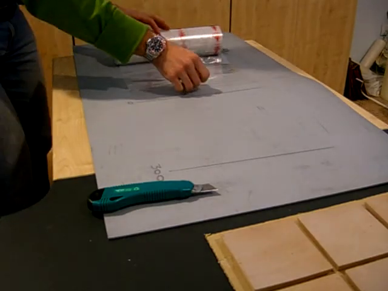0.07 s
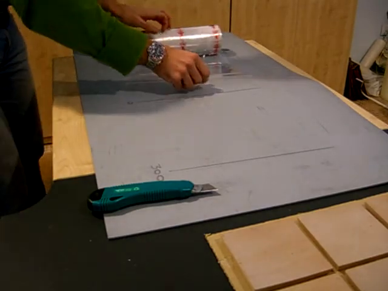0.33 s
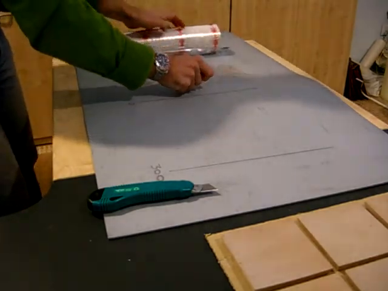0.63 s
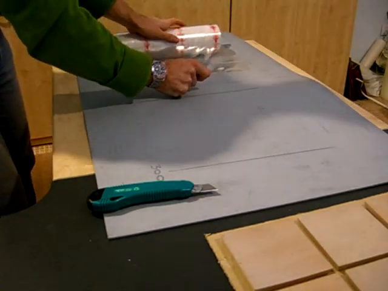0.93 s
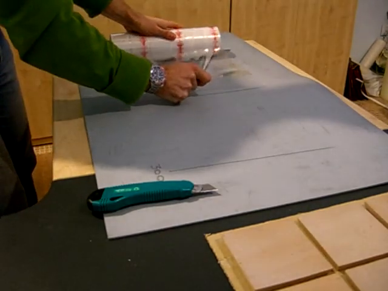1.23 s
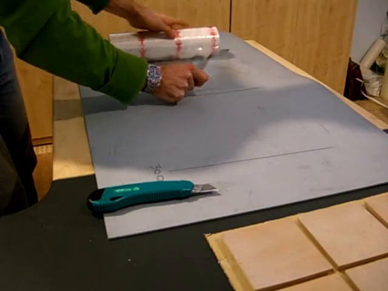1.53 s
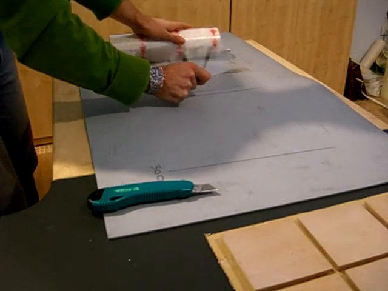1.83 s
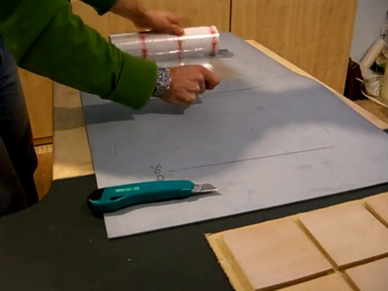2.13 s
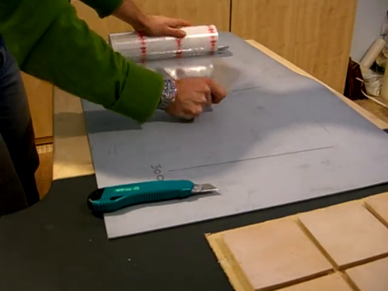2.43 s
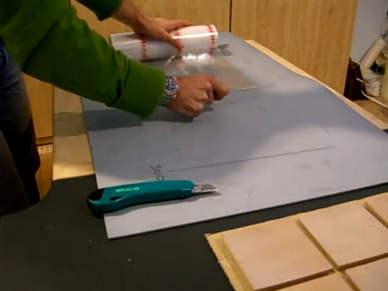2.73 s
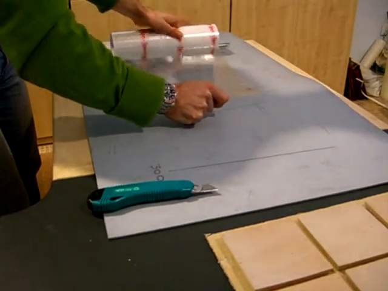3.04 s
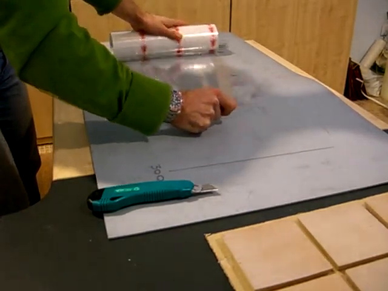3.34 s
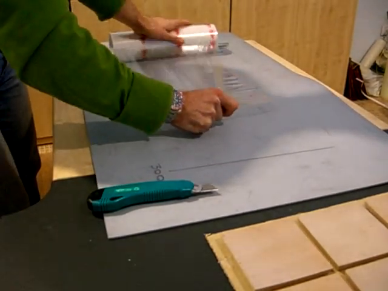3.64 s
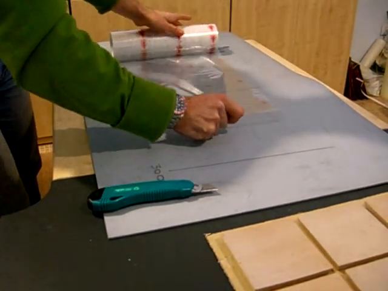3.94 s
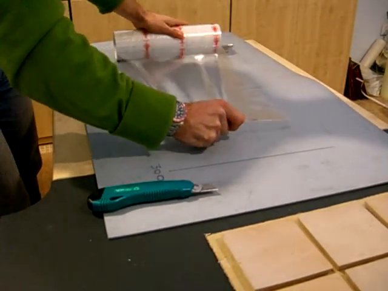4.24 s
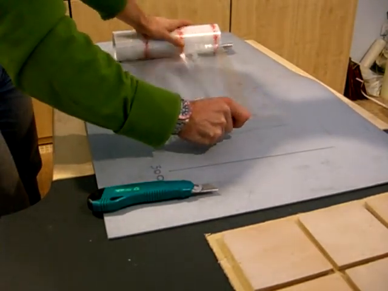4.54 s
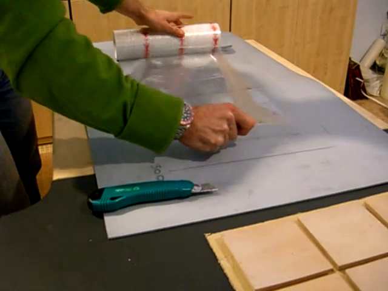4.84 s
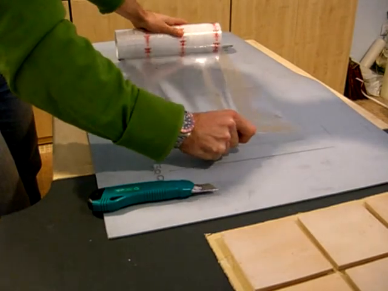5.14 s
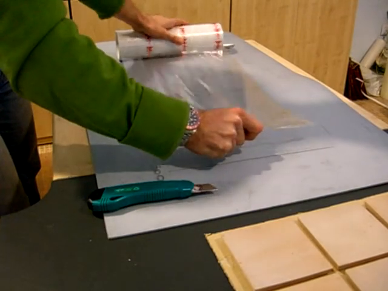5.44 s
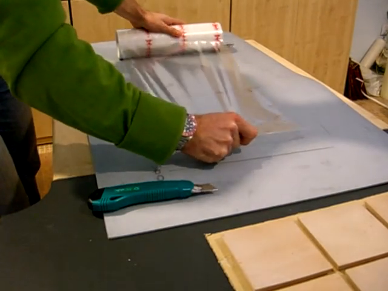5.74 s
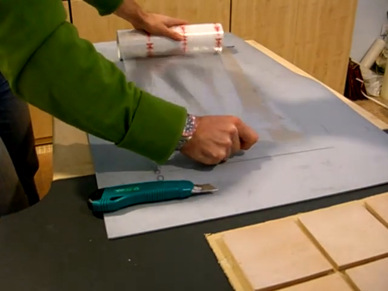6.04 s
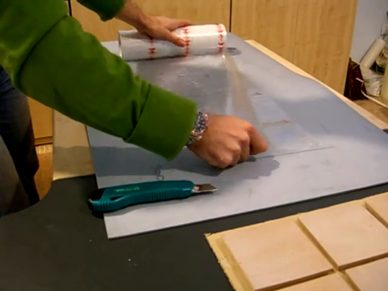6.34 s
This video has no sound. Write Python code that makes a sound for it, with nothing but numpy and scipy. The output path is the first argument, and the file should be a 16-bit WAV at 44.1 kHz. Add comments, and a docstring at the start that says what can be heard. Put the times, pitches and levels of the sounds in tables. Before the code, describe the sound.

Clear adhesive film is pulled off its roll in short tugs over a table in a small room. After faint handling and a softer first pull, a run of louder pulls follows about twice a second, each a sharp snap, a quick rip and a fading, slightly hollow hiss. The roll rubs and bumps softly on the board. It ends with a weak tug and light crinkles, heard close over a low hum and thin electrical whine.

```python
"""Clear adhesive film is pulled off its roll in short tugs, over a table in a small room.
Each tug breaks the glue with a snap, rips on in quick stick-slip, then peels with a hiss that dulls
as the roll slows, while the free strip rings with a hollow note. The roll rubs and bumps on the board
and the film ticks as it is handled. A thin electrical whine lies over the room's hum."""
import sys
import numpy as np
from scipy import signal
from scipy.fft import rfft, irfft, next_fast_len
from scipy.io import wavfile
from scipy.ndimage import minimum_filter1d

SR = 44100
rng = np.random.default_rng(int(sys.argv[2]) if len(sys.argv) > 2 else 0)


def dump(signal):
    """Clip the signal to [-1, 1] and save it as 16-bit WAV at the path in sys.argv[1]."""
    limited = np.clip(np.atleast_2d(signal).T, -1, 1)
    pcm = np.round(limited * 32767).astype(np.int16)
    wavfile.write(sys.argv[1], SR, pcm)


N = 281137
TIME = np.arange(N) / SR

# The tugs on the film; levels are relative. Each row: start in seconds, opening snap in dB, rip length
# in seconds, rip level in dB, slips per second, depth of sticking from 0 to 1, peel hiss in dB, seconds
# until the roll slows, opening treble in dB, rub in dB, wind-up before the tug in seconds, note of the
# free strip in Hz, its level against the hiss in dB.
TUGS = [(0.894, -25, 0.023, -28.5, 190, 0.7, -37.5, 0.085, 6, -46, 0.036, 2304, -13),
        (1.036, -17.5, .044, -18.5, 170, 0.4, -27, 0.19, 8, -33.5, 0.0043, 2090, -13),
        (1.887, -8.5, 0.046, -12.5, 270, 0.37, -20.5, 0.25, 7.3, -30.5, 0.002, 2453, -8.5),
        (2.347, -10.5, 0.067, -11.5, 168, 0.42, -20.5, 0.25, 8, -29.5, 0.049, 2207, -7),
        (2.800, -10, 0.043, -11, 190, 0.45, -23.2, 0.22, 9, -32.5, 0.034, 2117, -9),
        (3.257, -7.5, 0.039, -10, 350, 0.09, -19, 0.21, 6.5, -30.5, .04, 2294, -4),
        (3.658, -11, .057, -10, 126, 0.35, -20.5, 0.22, 7.5, -30, 0.025, 1950, -11),
        (4.129, -11, 0.038, -10, 155, 0.68, -22, 0.18, 7, -30.5, 0.066, 1946, -10.5),
        (4.548, -12, 0.019, -12.5, 140, .45, -34.5, .03, -1, -29, .03, 1692, -6),
        (4.574, -12, .05, -9.5, 210, .45, -19.5, 0.21, 6.5, -31.5, 0.0081, 1710, -7),
        (5.017, -7.5, 0.033, -9.5, 150, 0.45, -21, .185, 7, -29, 0.068, 1994, -6.5),
        (5.480, -20, 0.032, -23.5, 86, 0.64, -32, 0.039, 3, -33.5, 0.026, 2190, -6.5)]
# The bright tone of snaps and ticks. Each row: frequency in Hz, relative level in dB.
SNAP_COLOUR = [(100, -29), (300, -5), (900, -2), (1400, -2), (2200, 5), (3000, -1.5), (4300, 4.5),
               (6500, 0), (8300, -1.5), (10000, -3), (12200, 3.5), (14000, -3), (16000, -3.5)]


def rips(release_s=0.012, jitter=0.27, sag_db=2.0, uneven_db=1.64):
    """The peel line sticks and jumps at an uneven rate; each jump is a burst of cracks."""
    # The tone of the rip. Each row: frequency in Hz, relative level in dB.
    rip_colour = [(100, -25.5), (250, -16.5), (500, -4.5), (1100, -4), (2100, 2), (3200, -2.5), (4400, 4.5),
                  (6200, -1), (7800, 1.5), (10000, -3), (12200, 3), (14000, -11), (16000, -9.5)]
    power, pace = np.zeros(N), np.exp(jitter * drift(200))
    for start, _, length_s, level_db, slips_per_s, sticking, *_ in TUGS:
        first, count = int(start * SR), SR // 4
        age = TIME[:count]
        slip_index, phase = np.divmod(np.cumsum(slips_per_s * pace[first:first + count]) / SR, 1)
        strength = from_db(uneven_db * rng.standard_normal(count))[slip_index.astype(int)]
        slips = rms_one(1 - sticking + 2 * sticking * strength * np.exp(-2 * phase))
        release = np.exp(-np.maximum(age - length_s, 0) / release_s)
        tension = from_db(level_db - sag_db * age / length_s) * release
        power[first:first + count] += (tension * slips) ** 2
    return np.sqrt(power) * colour(cracks(per_s=9000, spread_db=2.0), rip_colour)


def snaps(decay_s=0.0015, trim_db=-1, body_hz=1500, tug_body_db=6.5, tug_edge_hz=16000, count=900):
    """A whole strip of glue lets go at once and shakes the taut film; every tug opens this way."""
    # Stray snaps of glue and flicks of film. Each row: start in seconds, relative level in dB,
    # boost or cut of the low body in dB, upper edge in Hz.
    strays = [(.463, -38.5, 12.5, 6000), (.563, -40, 13.5, 12000), (.873, -26, -10.5, 12000),
              (.882, -18.5, -11, 12000), (1.734, -23, -10, 4520), (2.357, -16, 4, 15000),
              (3.654, -14, 12, 15000), (4.091, -24, 8, 12000), (4.101, -18, -6, 11940),
              (4.538, -16, 2, 15000), (4.542, -12, 5, 14900), (4.569, -8, -12, 9030),
              (5.498, -14.5, 7.5, 12400), (6.028, -36, -2, 8000), (6.098, -33.5, 3, 8050),
              (6.205, -42, 12, 8000), (6.221, -40, 1, 8000)]
    openings = [(start, snap_db, tug_body_db, tug_edge_hz) for start, snap_db, *_ in TUGS]
    out, lowpass = np.zeros(N), signal.butter(1, body_hz, fs=SR)
    for start, snap_db, body_db, edge_hz in openings + list(strays):
        burst = rng.choice([-1, 1], count) * np.exp(-TIME[:count] / decay_s)
        burst *= np.sqrt(.003 * SR) / np.linalg.norm(burst)   # the energy of 3 ms at unit rms
        burst += (from_db(body_db) - 1) * signal.lfilter(*lowpass, burst)
        burst = signal.lfilter(*signal.butter(2, edge_hz, fs=SR), burst)
        out[int(start * SR):][:count] += from_db(snap_db + trim_db) * burst
    return colour(out, SNAP_COLOUR)


def roll_motion(swell_db_per_s=15.5, fade_db_per_s=61.5, dulling_db_per_s=50, dullest_db=-10.5,
                wind_up_db=7.5, rub_fade_db_per_s=47.5):
    """Each tug spins the roll, which gathers speed, then slows: hiss in dB, treble in dB, rub gain."""
    rustle, scuff, _ = handling()
    hiss_power, rub_power, trebles = rustle ** 2, scuff ** 2, []
    for start, *_, hiss_db, run_s, treble_db, rub_db, wind_up_s, _, _ in TUGS:
        age = TIME - start
        hiss_drop_db = np.maximum(swell_db_per_s * (run_s - age), fade_db_per_s * (age - run_s))
        hiss_power += (age >= 0) * from_db(hiss_db - hiss_drop_db) ** 2
        # The rub builds ahead of the tug and dies away after it.
        rub_drop_db = np.maximum(-wind_up_db * age / wind_up_s, rub_fade_db_per_s * age)
        rub_power += from_db(rub_db - np.minimum(rub_drop_db, 100)) ** 2
        trebles.append((start, treble_db))
    start, treble_db = hold_rows(trebles)
    bright_db = np.maximum(treble_db - dulling_db_per_s * (TIME - start), dullest_db)
    return 10 * np.log10(hiss_power), np.where(TIME < start, dullest_db, bright_db), np.sqrt(rub_power)


def peel(hiss_db, bright_db, trim_db=3.0, treble_db=-0.84, flutter_db=-0.27, thinning=.6):
    """Steady peeling is a dense, fine crackle; the slower it goes, the sparser and duller it is."""
    # The tone of the peel. Each row: frequency in Hz, relative level in dB.
    peel_colour = [(150, -30), (500, -13.5), (1200, -5.5), (1800, -1), (2500, 0), (3400, -2), (4500, -5),
                   (6200, -3.5), (8100, 1.5), (10000, -9.5), (12200, -1.5), (14000, -11.5), (16000, -20.5)]
    # Each row: band centre in Hz, share of the treble change.
    dulling = [(1200, -0.2), (2500, 0.1), (4500, 0.02), (8000, 0.75), (12000, 1.58), (15000, 2.0)]
    centres, shares = zip(*dulling)
    per_s = 18000 * from_db(thinning * np.maximum(hiss_db - hiss_db.max(), -40))
    parts = bands(colour(cracks(per_s, spread_db=1.5), peel_colour), centres)
    hiss = sum(part * from_db(share * (bright_db + treble_db)) for part, share in zip(parts, shares))
    return hiss * from_db(hiss_db + trim_db + flutter_db * drift(150))


def strip_note(hiss_db, half_width_hz=450):
    """The peel keeps the free strip ringing: a noise band, tending lower as the strip grows."""
    _, pitch_hz, level_db = hold_rows([(start, hz, db) for start, *_, hz, db in TUGS])
    lowpass = signal.butter(2, half_width_hz, fs=SR, output="sos")
    shake = signal.sosfilt(lowpass, rng.standard_normal((2, N)))
    phase = 2 * np.pi * np.cumsum(pitch_hz) / SR
    return from_db(hiss_db + level_db) * rms_one(shake[0] * np.cos(phase) + shake[1] * np.sin(phase))


def strip_colour(x, centre_hz=2150, width_hz=1500, neutral_db=-8):
    """The more the free strip rings, the more its hollow tone colours the snaps and rips."""
    _, note_db = hold_rows([(start, db) for start, *_, db in TUGS])
    hollow = signal.lfilter(*signal.iirpeak(centre_hz, centre_hz / width_hz, fs=SR), x)
    return x + (from_db(note_db - neutral_db) - 1) * hollow


def ringing(x):
    """Whatever shakes the film sets a few narrow resonances ringing."""
    # Modes of board, hollow roll and taut film. Each row: pitch in Hz, width in Hz, gain in dB.
    modes = [(250, 8.3, -6), (462, 41, -15), (810, 46, -10), (920, 44, -12), (2180, 32, -25),
             (2520, 17, -8.5), (4370, 30, -19)]
    return x + sum(from_db(db) * signal.lfilter(*signal.iirpeak(hz, hz / width, fs=SR), x)
                   for hz, width, db in modes)


def rub(gain, trim_db=-2, grain_db=2):
    """Roll and hand slide on the board with a dull, uneven scuff."""
    # The tone of the scuff. Each row: frequency in Hz, relative level in dB.
    rub_colour = [(60, -25), (150, -14), (280, -3), (500, 0.5), (900, 0.5), (1400, -4.5), (3000, -24.5)]
    return gain * from_db(trim_db + grain_db * drift(70)) * colour(rng.standard_normal(N), rub_colour)


def handling():
    """Each shift of the hand's grip is a smooth swell in the gains of rustle, rub and ticks."""
    # Shifts of grip. Each row: peak time in seconds, half length in seconds, then the relative
    # levels of rustle, rub and ticks in dB.
    grips = [(0.0, .1, -61, -65, -56), (0.567, 0.044, -49, -58, -52), (.76, 0.073, -47.5, -47.5, -53.5),
             (1.55, 0.037, -61, -64, -53), (1.785, 0.063, -57, -45.5, -55),
             (4.102, 0.04, -32.5, -38, -26.5), (4.529, .018, -31, -33, -25.5),
             (4.998, 0.026, -31, -40, -27), (5.87, .1, -64, -53.5, -74), (6.205, 0.074, -46, -53, -50.5)]
    return sum(np.outer(from_db(levels_db), np.exp(-.5 * ((TIME - peak_s) / half_s) ** 2))
               for peak_s, half_s, *levels_db in grips) + 1e-6


def ticks(per_s=280, spread_db=1.8, decay_s=0.0019, edge_hz=14000):
    """The film crinkles in small random ticks as the grip shifts."""
    *_, gain = handling()
    kicks = np.abs(cracks(per_s, spread_db)) + 1e-18
    bursts = signal.lfilter([1], [1, -np.exp(-1 / (decay_s * SR))], kicks)
    crinkle = colour(bursts * rng.standard_normal(N), SNAP_COLOUR)
    return gain * rms_one(signal.lfilter(*signal.butter(1, edge_hz, fs=SR), crinkle))


def bumps(decay_s=0.011, count=6000):
    """The roll meets the board softly: a brief, dull thud or scuff, an octave wide."""
    # Each row: start in seconds, relative level in dB, band centre in Hz.
    contacts = [(0.234, -46, 240), (.282, -42.5, 260), (0.323, -43, 260), (.745, -42, 1010),
                (0.901, -33.5, 1100), (1.734, -35, 975), (1.739, -41, 203), (3.222, -24.5, 970),
                (5.498, -31, 800)]
    out = np.zeros(N)
    for start, db, hz in contacts:
        octave = signal.butter(2, [hz / np.sqrt(2), hz * np.sqrt(2)], "band", fs=SR, output="sos")
        shake = rms_one(signal.sosfilt(octave, rng.standard_normal(count)))
        out[int(start * SR):][:count] += from_db(db) * shake * np.exp(-TIME[:count] / decay_s)
    return out


def near_reflections(x, level_db=-10, decay_s=0.039, delay_s=.002, count=4000):
    """Table top and cupboard doors throw back a quick spray of echoes."""
    age = TIME[:count]
    spray = rng.standard_normal(count) * (age > delay_s) * np.exp(-age / decay_s)
    return x + from_db(level_db) * signal.oaconvolve(x, spray / np.linalg.norm(spray))[:N]


def room(x, wet_db=-7, build_s=0.0025):
    """The walls scatter each band's energy into a diffuse tail that dies at its own rate."""
    # Each row: band centre in Hz, seconds to fall by 60 dB.
    decay_times = [(100, 0.23), (300, 0.38), (900, 0.1), (2200, 0.36), (4500, 0.41), (8000, 0.19),
                   (12000, 0.35), (15000, 0.24)]
    centres, t60s = zip(*decay_times)
    age, tail = TIME[:SR // 2], 0
    for part, air, t60 in zip(bands(x, centres), bands(rng.standard_normal(N), centres), t60s):
        build = 1 - np.exp(-(age / build_s) ** 2)
        decay = (from_db(-60 * age / t60) * build) ** 2
        energy = signal.oaconvolve(part ** 2, decay / decay.sum())[:N]
        tail += rms_one(air) * np.sqrt(np.abs(energy))
    return x + from_db(wet_db) * tail


def background(floor_db=-47):
    """Room hum and hiss lie under a few thin, slightly wavering electrical tones."""
    # Mains hum and whine. Each row: pitch in Hz, rms level in dB, waver in Hz.
    tones = [(240.7, -64, .5), (474, -61, 0.52), (529, -63.5, 0.39), (940, -62, 0.35), (6605, -57, 3.3),
             (7536, -52.5, 1.1), (13184, -54.5, 1), (15030, -49.3, 8)]
    # The room tone. Each row: frequency in Hz, relative level in dB.
    floor_colour = [(20, -6.5), (55, 2.5), (80, -2), (130, -5), (250, -5), (380, -8), (520, -7.5),
                    (680, -5.5), (930, -3), (1150, -9), (2500, -12.5), (5000, -19), (10000, -18.5),
                    (16000, -18)]
    whine = 0
    for hz, db, waver_hz in tones:
        phase = 2 * np.pi * np.cumsum(hz + waver_hz * drift(60)) / SR
        whine += from_db(db) * np.sqrt(2) * np.sin(phase)
    return whine + from_db(floor_db) * colour(rng.standard_normal(N), floor_colour)


def cracks(per_s, spread_db):
    """Glue threads break at random, many small and a few large; unit rms at any rate."""
    sizes = from_db(spread_db * np.minimum(rng.exponential(1, N), 4)) * rng.choice([-1, 1], N)
    return rms_one(sizes * (rng.random(N) < per_s / SR) / np.sqrt(per_s))


def from_db(db):
    """Decibels to gain."""
    return 10 ** (np.asarray(db) / 20)


def rms_one(x):
    """Scale to unit rms."""
    return x / np.sqrt(np.mean(x ** 2) + 1e-20)


def hold_rows(rows):
    """Turn a cue list's columns into signals, each row held from its start until the next."""
    starts, *columns = np.transpose(rows)
    latest = np.maximum(np.searchsorted(starts, TIME, side="right") - 1, 0)
    return [column[latest] for column in (starts, *columns)]


def at_hz(points, hz):
    """Read a curve on a log-frequency axis."""
    point_hz, value = np.transpose(points)
    return np.interp(np.log(hz + 1), np.log(point_hz), value)


def drift(per_s):
    """A random wander of unit rms."""
    knots = rng.standard_normal(int(N / SR * per_s) + 2)
    return rms_one(np.interp(TIME * per_s, np.arange(len(knots)), knots))


def colour(x, spectrum, size=4096):
    """Shape the tone with a minimum-phase filter of unit power gain."""
    cepstrum = irfft(np.log(from_db(at_hz(spectrum, np.fft.rfftfreq(size, 1 / SR)))))
    response = irfft(np.exp(rfft(2 * cepstrum * (np.arange(size) < size // 2))))
    return signal.oaconvolve(x, response / np.linalg.norm(response))[:len(x)]


def bands(x, centres):
    """Split into overlapping bands that add up to the whole."""
    size = next_fast_len(len(x))
    whole, hz = rfft(x, size), np.fft.rfftfreq(size, 1 / SR)
    return [irfft(whole * at_hz(np.c_[centres, solo], hz), size)[:len(x)]
            for solo in np.eye(len(centres))]


def gain_control(x, ceiling_db=-16.5, attack_s=0.0043, hold_s=0.33, release_db_per_s=20):
    """Loud sound ducks the gain quickly; it is held there, then creeps back."""
    pole, hold = np.exp(-1 / (attack_s * SR)), 2 * int(hold_s * SR / 2) + 1
    level_db = 10 * np.log10(signal.lfilter([1 - pole], [1, -pole], x[0] ** 2) + 1e-12)
    duck_db = np.minimum(ceiling_db - level_db, 0)
    held_db = -minimum_filter1d(duck_db, hold, origin=hold // 2, mode="nearest")
    release_db = release_db_per_s * TIME
    cut_db = np.maximum.accumulate(held_db + release_db) - release_db
    return x * from_db(-cut_db)


def scene(film_db=-0.5):
    """The roll's motion drives hiss, note and rub; the whole mix is the same in both channels."""
    hiss_db, bright_db, rub_gain = roll_motion()
    rolling = peel(hiss_db, bright_db) + strip_note(hiss_db) + rub(rub_gain)
    tearing = strip_colour(rips() + snaps())
    film = from_db(film_db) * ringing(tearing + rolling + ticks() + bumps())
    mono = room(near_reflections(film)) + background()
    return np.array([mono, mono])


def record(dry, top=0.69, cutoff_hz=15800):
    """Gain control, softly rounded peaks and a steep cut of the highest treble."""
    rounded = top * np.tanh(gain_control(dry) / top)
    return signal.sosfilt(signal.ellip(10, .1, 80, cutoff_hz, fs=SR, output="sos"), rounded)


dry = scene()
out = record(dry)
dump(out)
```